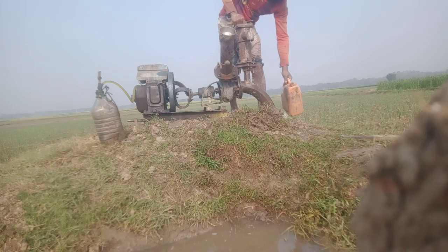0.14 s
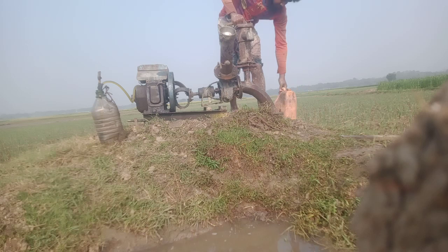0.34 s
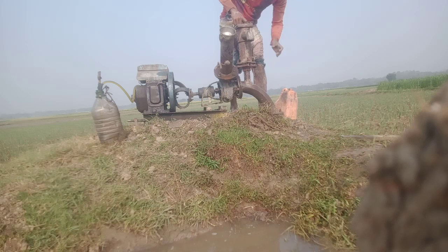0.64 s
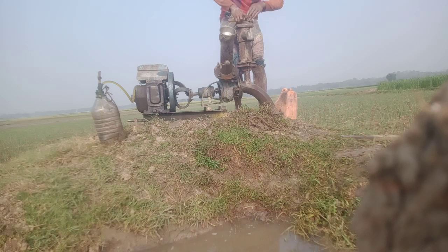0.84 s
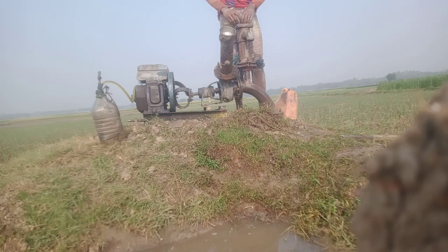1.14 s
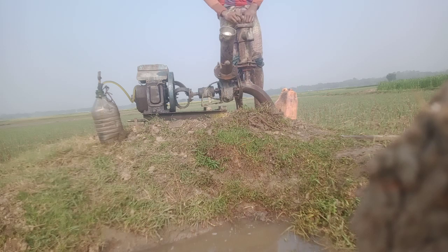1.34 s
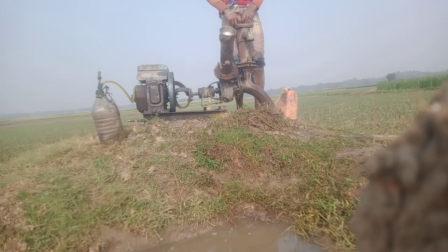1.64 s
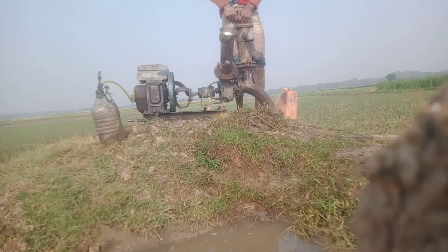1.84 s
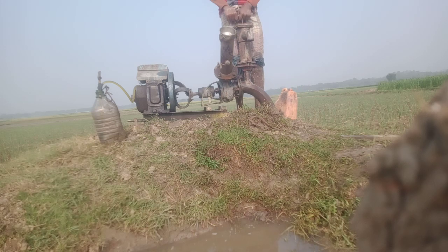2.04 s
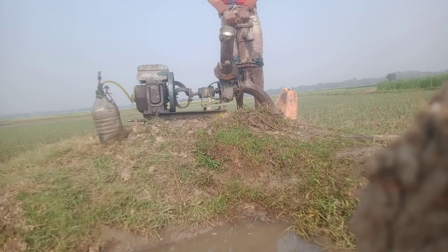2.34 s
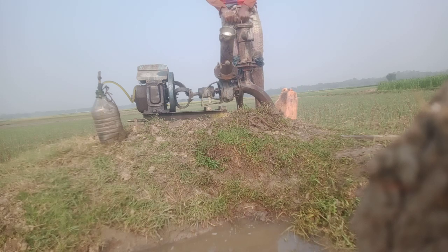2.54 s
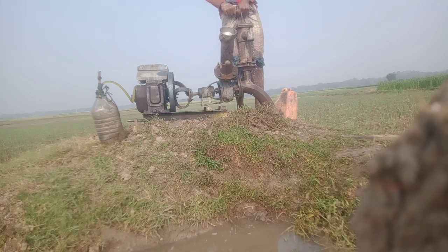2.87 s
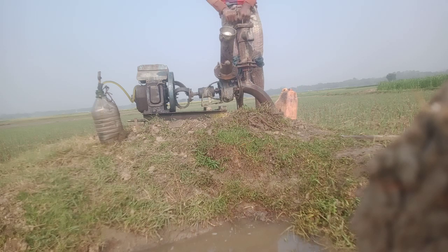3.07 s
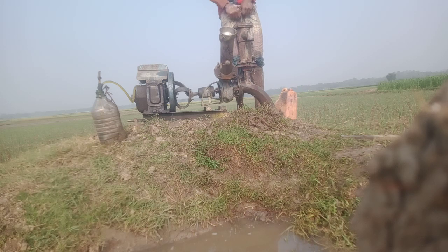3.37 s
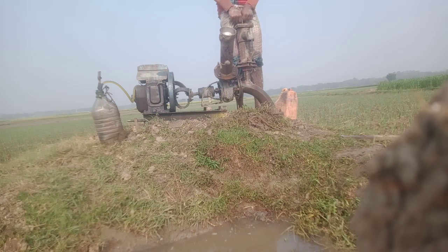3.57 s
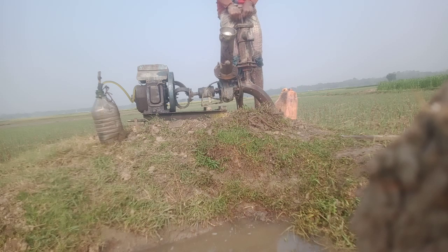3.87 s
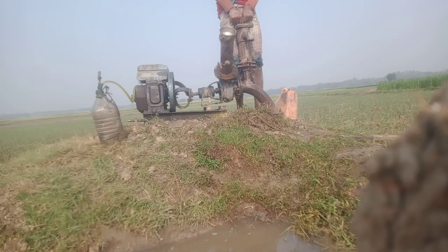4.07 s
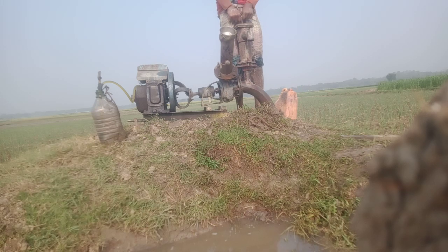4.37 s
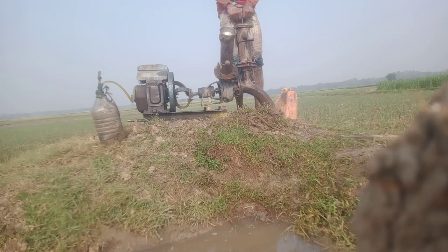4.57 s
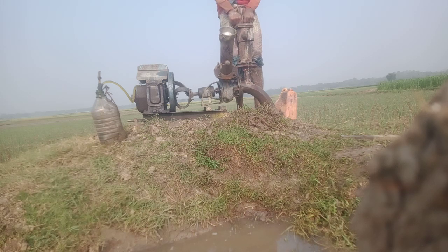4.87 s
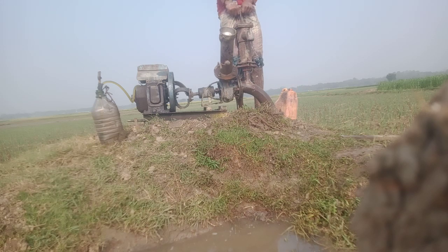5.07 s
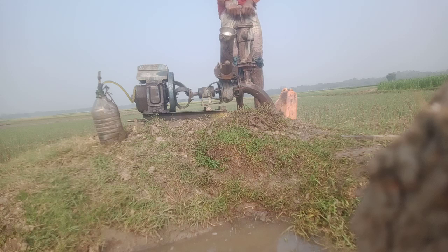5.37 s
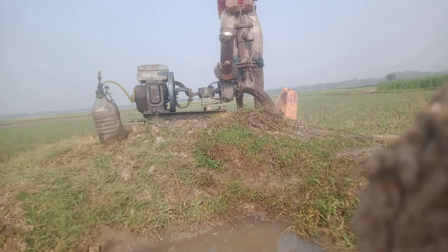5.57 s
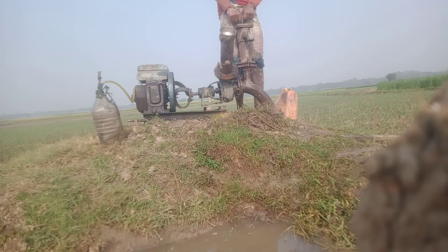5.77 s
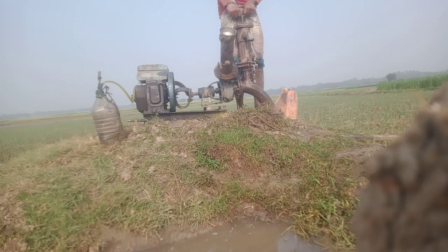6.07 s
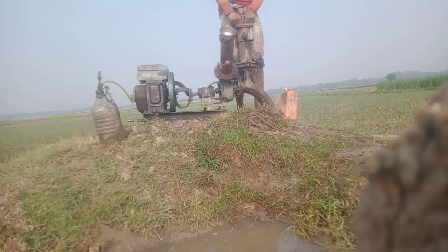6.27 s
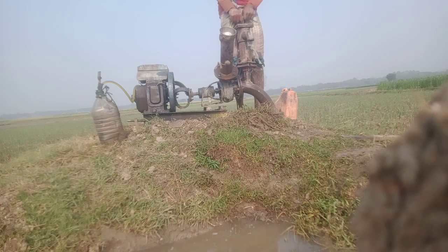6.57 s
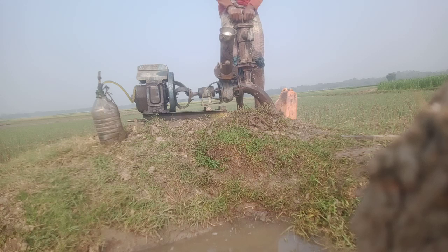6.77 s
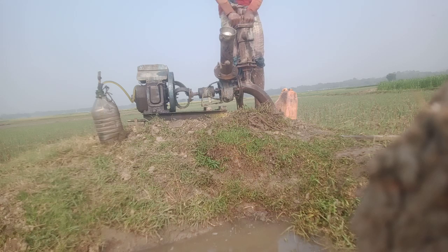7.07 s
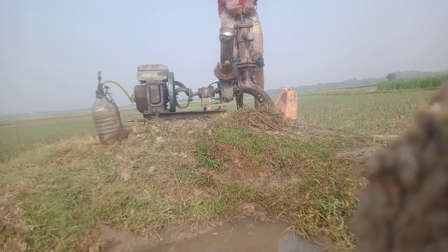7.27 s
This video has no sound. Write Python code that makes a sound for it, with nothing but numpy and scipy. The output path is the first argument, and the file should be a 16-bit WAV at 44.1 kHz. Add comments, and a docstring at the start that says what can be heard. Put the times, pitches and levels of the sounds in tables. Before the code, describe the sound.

An iron hand pump clinks, then clanks, squawks and gulps in quick strokes as water churns, with a faint breeze and distant birds.

```python
"""A cast-iron hand pump draws water into the pipe of a stopped diesel pump in an open field.
After a few loose clinks the handle is worked three to four times a second: the iron links clank,
the valve thumps shut, and the piston's seal squawks as it sticks and slips. Water churns and
bubbles, and the air in the barrel whoops and gulps, its pitch rising and falling with every stroke.
Behind the pump are a low breeze and faint, distant birds."""
import sys
import numpy as np
from scipy import signal
from scipy.fft import rfft, irfft
from scipy.io import wavfile
from scipy.ndimage import uniform_filter1d

SR = 44100
rng = np.random.default_rng(int(sys.argv[2]) if len(sys.argv) > 2 else 0)


def bounce(signal):
    """Save signal as a 16-bit WAV file at the path given by the first command-line argument."""
    frames = np.transpose(np.atleast_2d(signal))
    limited = np.clip(frames, -1, 1)
    pcm = np.round(limited * 32767).astype(np.int16)
    wavfile.write(sys.argv[1], SR, pcm)


N = 327215
TIME = np.arange(N) / SR
AGE = TIME[:SR // 3]  # seconds since one short sound began


def amp(db):
    """Turns decibels into a gain."""
    return 10 ** (np.asarray(db) / 20)


def unit_rms(x):
    """Scales a signal to an average strength (rms) of 1."""
    return x / np.sqrt(np.mean(x ** 2) + 1e-20)


def db_at(spectrum, hz):
    """Reads a level between the points of a spectrum table."""
    f, db = np.transpose(spectrum)
    return np.interp(np.log(hz + 1), np.log(f), db)


def noise(colour, size=len(AGE)):
    """Noise of rms 1; colour(f) says how strong each frequency is, in dB."""
    white = rfft(rng.standard_normal(size))
    return unit_rms(irfft(white * amp(colour(np.fft.rfftfreq(size, 1 / SR))), size))


def wander(hz, size=len(AGE)):
    """A smooth random wobble, up to about hz wiggles a second."""
    return noise(lambda f: -10 * np.log10(1 + (f / hz) ** 6), size)


def lumps(db, hz, size=len(AGE)):
    """A gain that rises and falls at random by roughly db."""
    return unit_rms(amp(2 * db * np.tanh(wander(hz, size) / 2)))


def strike(rise, t60):
    """Swells over about rise seconds, then fades by 60 dB every t60 seconds."""
    shape = (1 - np.exp(-AGE / rise)) * amp(-60 * AGE / t60)
    return shape / shape.max()


def arch(length):
    """Rises from 0 to 1 and falls back within length seconds."""
    return np.sin(np.pi * np.minimum(AGE / length, 1)).clip(0)


def tone(hz):
    """A pure tone of rms 1 with a steady or moving pitch."""
    cycles = np.cumsum(hz * np.ones(len(AGE))) / SR
    return np.sqrt(2) * np.sin(2 * np.pi * (cycles + rng.random()))


def resonate(x, hz, width_hz):
    """Makes a signal ring around a steady or moving pitch."""
    turn = np.exp(2j * np.pi * np.cumsum(hz * np.ones(len(x))) / SR)
    decay = np.exp(-np.pi * width_hz / SR)
    return 2 * (turn * signal.lfilter([1 - decay], [1, -decay], x / turn + 1e-18)).real


def play(source, rows):
    """Makes one sound per table row and adds it at the row's time."""
    mix = np.zeros(N)
    for row in rows:
        sound = source(*row)
        part = mix[max(round(row[0] * SR), 0):][:len(sound)]
        part += sound[:len(part)]
    return mix


# the breeze, from bass to treble: f/Hz, level/dB
BREEZE_SPECTRUM = [(20, -54.5), (50, 0), (120, 13.5), (250, -8), (500, -59), (1500, -15.5), (4200, -27),
                   (5500, -38), (16000, -59)]
def breeze():
    """Moving air rumbles unevenly under a smoother hiss."""
    air = noise(lambda f: db_at(BREEZE_SPECTRUM, f), N)
    rumble = signal.sosfiltfilt(signal.butter(2, 400, fs=SR, output="sos"), air)
    hiss = air - rumble
    return amp(-48) * (rumble * lumps(6.4, 28, N) + hiss * lumps(1.3, 14, N))


def chirp(t, hz, db, length=0.09, glide=1.7):
    """A bird's thin, warbling whistle slides in pitch."""
    return amp(db) * tone(hz * (1 + glide * AGE + 0.035 * wander(170))) * arch(length)


# rising calls that stand out from the flock: t/s, f/Hz, level/dB
BIRD_CALLS = [(.32, 2350, -58), (1.12, 3800, -62), (1.19, 3000, -63)]
def birds(per_s=10, db=-67, low_hz=2200, high_hz=4600):
    """Small birds twitter far off, each call with its own pitch and slide."""
    when, pitch, slope = rng.random((round(per_s * N / SR), 3)).T
    times = (np.arange(len(when)) + when) / per_s
    pitches = low_hz * (high_hz / low_hz) ** pitch
    flock = [(t, hz, db, 0.05, glide) for t, hz, glide in zip(times, pitches, 6 * slope - 2)]
    return play(chirp, BIRD_CALLS + flock)


def column_hz(t, rest_hz=271.7, low_hz=259.6, high_hz=350.4, rising_share=0.5467):
    """Each stroke shortens and lengthens the barrel's air column, so its pitch rises and falls."""
    turns = [row[0] for row in STROKES]
    turns.append(2 * turns[-1] - turns[-2])  # the end of the last stroke
    progress = np.interp(t, turns, np.arange(len(turns))) % 1
    lift = np.sin(np.pi / 2 * np.interp(progress, [0, rising_share, 1], [0, 1, 0])) ** 2
    bottom_hz = np.interp(t, turns[:3], [rest_hz, rest_hz, low_hz])
    return bottom_hz + (high_hz - bottom_hz) * lift


# churning water, from bass to treble: f/Hz, level/dB
CHURN_SPECTRUM = [(30, -37), (80, 1), (180, 7), (550, -8.5), (1000, -11), (2300, -8.5), (4000, -19.5),
                  (5500, -31.5), (16000, -61)]
# air hissing past the seal: f/Hz, level/dB
LEAK_SPECTRUM = [(1000, -11), (4000, 0.5), (7000, 0), (10000, -18), (16000, -6.5)]
# a pipe shut at one end rings near odd multiples of its lowest note: multiple, level/dB
PIPE_OVERTONES = [(3.102, -6.5), (5.201, -8), (7.299, -10.5)]
# how strongly the water moves: t/s, level/dB
WATER_LEVELS = [(0, -40), (.3, -68.5), (1.8, -63), (1.89, -39), (4, -42.5), (4.6, -38), (7.42, -42)]
def water(width_hz=32):
    """Water churns and the air hums; as the column shortens, air spits past the seal and whistles."""
    hz = column_hz(TIME)
    rising = np.maximum(np.gradient(hz), 0)
    airflow = np.tanh(unit_rms(uniform_filter1d(rising, size=200)))
    churn = noise(lambda f: db_at(CHURN_SPECTRUM, f), N) * lumps(8.15, 33, N)
    breath = rng.standard_normal(N) * lumps(4, 30, N)

    def pipe(multiple):
        """One breathy note of the air column."""
        ring = resonate(breath, multiple * hz, width_hz * np.sqrt(multiple))
        return unit_rms(resonate(ring, multiple * hz, 5 * width_hz))
    hollow = amp(-4.5) * unit_rms(sum(amp(level) * pipe(k) for k, level in PIPE_OVERTONES))
    spray = amp(-22) * noise(lambda f: db_at(LEAK_SPECTRUM, f), N) * lumps(5.6, 700, N)
    hum = amp(-3) * np.sqrt(2) * np.sin(2 * np.pi * np.cumsum(hz) / SR) * lumps(2.5, 15, N)
    sound = amp(2.5) * churn + amp(1) * pipe(0.922) + hum + (hollow + spray) * airflow
    return amp(np.interp(TIME, *np.transpose(WATER_LEVELS))) * sound


# water filling the spout: t/s, length/s, level/dB, first f/Hz, last f/Hz
SPOUT_GURGLES = [(1.858, 0.11, -41, 818, 1066), (4.963, 0.14, -54, 864, 1126),
                 (5.172, 0.15, -40, 522, 1007), (5.765, 0.11, -33.5, 630, 970),
                 (6.205, 0.18, -36, 740, 973), (6.802, .2, -36, 689, 1051), (7.121, 0.09, -31, 659, 1095),
                 (7.192, 0.24, -37.5, 342, 597)]
def gurgle(t, length, db, first_hz, last_hz):
    """A shrinking pocket of air sings upward, shaken by the splashing."""
    filled = np.minimum(AGE / length, 1)
    hz = (first_hz + (last_hz - first_hz) * filled) * (1 + 0.015 * wander(74))
    return amp(db) * tone(hz) * lumps(9.9, 70) * arch(length)


# big bubbles bursting: t/s, level/dB, f/Hz
BUBBLES = [(0.597, -42.5, 552), (3.071, -26.5, 547), (3.611, -27, 606), (5.793, -23, 710),
           (6.301, -21, 593), (6.885, -28, 628)]
def plop(t, db, hz):
    """A bubble rings briefly, its pitch rising as it nears the surface."""
    return amp(db) * tone(hz * (0.975 + 4 * AGE)) * strike(0.0042, t60=0.032)


def gulp(t, db, t60, rise=0.0032):
    """The barrel's air rings at a sliding pitch; sloshing shakes it and roughens the overtones."""
    hz = column_hz(t + AGE)
    overtones = sum(amp(level) * tone(k * hz) * wander(130) for k, level in PIPE_OVERTONES)
    low_note = tone(hz * (1 + 0.018 * wander(60))) * lumps(1.2, 60)
    return amp(db) * (low_note + amp(-14) * overtones) * strike(rise, t60)


# the rocking pump jolts the air inside it: t/s, level/dB
ROCKING_JOLTS = [(3.985, -32.5), (4.985, -31), (5.235, -27.5)]
# handle strokes: piston turns t/s, gulp level/dB, valve shuts t/s, thump level/dB, slap level/dB
STROKES = [(1.84, -31.5, 2.07, -37, -45), (2.15, -28, 2.311, -30, -32), (2.395, -27.5, 2.54, -31, -33.5),
           (2.628, -21.5, 2.776, -31.5, -20), (2.812, -29, 3.018, -24.5, -23.5),
           (3.102, -24.5, 3.25, -36.5, -34), (3.347, -27, 3.525, -35, -25), (3.615, -28, 3.75, -31, -30.5),
           (3.92, -29, 4.05, -24, -31.5), (4.137, -26, 4.3, -32, -30.5), (4.396, -25, 4.542, -41, -25),
           (4.677, -20.5, 4.85, -33, -32), (4.911, -20.5, 5.123, -28, -25.5),
           (5.188, -27, 5.398, -23.5, -28.5), (5.474, -25, 5.68, -29, -31), (5.758, -25.5, 5.954, -25, -43),
           (6.055, -27, 6.228, -28, -26), (6.335, -19.5, 6.498, -27, -50), (6.608, -23, 6.775, -25.5, -32),
           (6.882, -24, 7.049, -20, -27), (7.148, -25.5, 7.316, -26, -28)]
def barrel_air(push_t60=0.16, slap_t60=0.046, jolt_t60=0.15, push_rise=0.0047, bounce_s=0.028):
    """The piston pushes the air once a stroke; valve, knocks, whoops, bubbles and rocking jolt it."""
    pushes = [(t, db, push_t60, push_rise) for t, db, *_ in STROKES]
    slaps = [(t, db, slap_t60) for *_, t, _, db in STROKES]
    bounces = [(t + bounce_s, db - 2, t60) for t, db, t60 in slaps]  # the valve bounces once
    # once pumping starts, water softens these jolts
    jolts = [(t, db - (8.5 if t < STROKES[0][0] else 12.5), jolt_t60) for t, db, *_ in KNOCKS_AND_WHOOPS]
    bubbles = [(t, db - 6.5, jolt_t60) for t, db, _ in BUBBLES]
    rocking = [(t, db, jolt_t60) for t, db in ROCKING_JOLTS]
    return play(gulp, pushes + slaps + bounces + jolts + bubbles + rocking)


def thump(t, db):
    """The valve stops the water: a heavy note that sags in pitch, and a dull splash."""
    splash = noise(lambda f: db_at(CHURN_SPECTRUM, f)) * strike(0.00027, t60=0.17)
    hz = 150 * (0.888 + 0.5 * np.exp(-AGE / 0.0035)) * rng.uniform(0.75, 1.3)
    return amp(db) * (tone(hz) * strike(0.011, t60=0.031) + amp(-9.5) * splash)


# the valve falls shut a second time: t/s, level/dB
SECOND_THUMPS = [(3.912, -30.5), (5.141, -28.5), (6.793, -35.5)]
def foot_valve():
    """The valve at the bottom shuts on the way back of every stroke, sometimes twice."""
    return play(thump, [(t, db) for *_, t, db, _ in STROKES] + SECOND_THUMPS)


def tick(t, db, centre_hz=5000):
    """Small metal parts snap brightly, with almost no ring."""
    bright = noise(lambda f: -16 * np.log2((f + 1) / centre_hz) ** 2)
    return amp(db) * bright * strike(0.0001, t60=0.019)


# a pin snaps across its hole: t/s, level/dB
PIN_SNAPS = [(3.861, -37), (4.063, -43), (4.114, -45), (4.865, -40), (4.984, -38), (5.8, -45), (7.142, -40)]
def ticks(per_s=12, below_water_db=10, spread_db=7):
    """Pins snap; grit and loose washers tick at random, louder when more water moves."""
    when, size = rng.random((round(per_s * N / SR), 2)).T
    times = (np.arange(len(when)) + when) / per_s
    levels = np.interp(times, *np.transpose(WATER_LEVELS)) - below_water_db + spread_db * (2 * size - 1)
    return play(tick, PIN_SNAPS + list(zip(times, levels)))


# rattling iron, from bass to treble: f/Hz, level/dB
RATTLE_SPECTRUM = [(100, -56.5), (500, 2), (900, -3), (1500, 6), (1850, -2), (2900, 2), (4200, -11.5),
                   (5000, -20), (7000, -24.5), (10000, -45), (16000, -50.5)]
def joints(slack_s=0.009, settle_s=0.007):
    """Rough joints scrape just before and after each knock or whoop."""
    times, levels = np.transpose(KNOCKS_AND_WHOOPS)[:2]
    coarse_time = TIME[::SR // 1000]
    since = coarse_time[:, None] - times
    pressure = (amp(levels) * np.exp(np.minimum(since / slack_s, -since / settle_s))).sum(axis=1)
    grit = noise(lambda f: db_at(RATTLE_SPECTRUM, f), N) * lumps(1.3, 200, N)
    return amp(-27) * grit * np.interp(TIME, coarse_time, pressure)


# the rod grinds through its guide: t/s, length/s, level/dB
ROD_SCRAPES = [(0.101, 0.05, -49.5), (2.038, 0.048, -38.5), (3.274, 0.046, -29), (3.343, 0.032, -37.5),
               (4.013, 0.02, -42), (5.358, 0.023, -30)]
def scrape(t, length, db):
    """Dry iron catches and lets go in a ragged, grainy burst."""
    grains = noise(lambda f: db_at(RATTLE_SPECTRUM, f)) * lumps(4.2, 320)
    return amp(db) * grains * np.sqrt(arch(length))


# the notes that the rubbing seal brings out: f/Hz, width/Hz, level/dB
SEAL_NOTES = [(1170, 70, 10.5), (1560, 150, 8.5), (2920, 160, 9.5), (3950, 200, -3), (4900, 120, -7)]
# the piston's seal sticks and slips: t/s, length/s, level/dB
SEAL_SQUAWKS = [(5.057, 0.015, -24), (5.588, 0.054, -26.5), (5.864, 0.05, -24), (6.435, 0.031, -27)]
def squawk(t, length, db, slips_hz=260, jitter=0.5):
    """Uneven slips of the seal make the barrel wall ring, with a rasp at each slip."""
    cycles = np.cumsum(slips_hz * np.exp(jitter * wander(300))) / SR
    slips = np.diff(np.floor(cycles), prepend=0)  # one click per cycle
    pressure = arch(length) ** 0.57
    rubbing = (unit_rms(slips) + 0.8 * rng.standard_normal(len(AGE))) * pressure
    wall = sum(amp(level) * unit_rms(resonate(resonate(rubbing, f, 2 * width), f, 2 * width))
               for f, width, level in SEAL_NOTES)
    rasp = noise(lambda f: db_at(RATTLE_SPECTRUM, f)) * pressure * (1 + np.cos(2 * np.pi * cycles) / 2)
    sound = unit_rms(unit_rms(wall) + amp(-6) * unit_rms(rasp))
    return amp(db) * sound * np.sqrt(length / AGE[-1])  # short and long squawks are equally strong


def ringing(notes, scatter_db, detune, colour=lambda f: 0):
    """Struck metal rings at several notes at once, their levels and pitches a little new each time."""
    return unit_rms(sum(amp(level + colour(f) + scatter_db * rng.standard_normal())
                        * tone(f * (1 + detune * rng.standard_normal())) for f, level in notes))


# the notes of the pins and washers: f/Hz, level/dB
PIN_NOTES = [(4600, 8.5), (5760, 3), (6670, 2.5), (7020, -3), (7500, -9), (8980, -12)]
def ping(t, db):
    """Small steel parts ring high and briefly."""
    return amp(db) * ringing(PIN_NOTES, scatter_db=5, detune=0.015) * strike(0.00027, t60=0.06)


# the free handle rings on after some knocks: t/s, level/dB, f/Hz
HANDLE_RINGS = [(0.008, -47, 3190), (0.748, -55, 3510), (1.062, -49, 3235), (3.981, -45, 2306),
                (6.128, -32, 2420), (6.613, -36, 3780), (6.948, -29, 2390), (7.367, -51, 3930)]
def handle_ring(t, db, hz, dry_t60=0.36, wet_t60=0.16):
    """The iron handle holds one thin note, longer while the pump is still dry."""
    return amp(db) * tone(hz) * strike(0.0011, dry_t60 if t < STROKES[0][0] else wet_t60)


# the notes of the pump's body and handle: f/Hz, level/dB
IRON_NOTES = [(1010, 9), (1160, -15), (1430, 8.5), (1560, 3.5), (2190, 12), (2400, 7.5), (2890, 4.5),
              (3560, -20.5), (3820, -3.5), (4090, -6)]
def knock_or_whoop(t, db, hz, treble_db, t60):
    """A crack, a rattle and ringing iron around one strongest note, of the iron or the barrel's air."""
    def colour(f):
        """Lifts the sound around hz and turns the treble up or down."""
        peak = 6 * np.exp(-(np.log((f + 1) / hz) / 0.047) ** 2)
        treble = 0.5 + 0.5 * np.tanh((f - 3300) / 500)
        return peak + 1.28 * (treble_db + 13) * treble
    snap = strike(0.00019, t60=0.018)
    delays = rng.uniform(0.003, 0.018, size=2)  # loose parts bounce back twice
    rebounds = sum(np.interp(AGE - delay, AGE, snap, left=0) for delay in delays)
    bright = noise(lambda f: db_at(RATTLE_SPECTRUM, f) + colour(f) + 4 * np.log2(1 + f / 4000))
    crack = bright * (snap + amp(-10) * rebounds)
    swell = strike(0.00094, 0.57 * t60)
    chatter = swell * lumps(5.6, 87)
    chatter *= np.linalg.norm(swell) / np.linalg.norm(chatter)  # uneven, but with the same energy
    rattle = noise(lambda f: db_at(RATTLE_SPECTRUM, f) + colour(f)) * chatter
    body = ringing(IRON_NOTES, scatter_db=7.5, detune=0.014, colour=colour) * strike(0.0016, t60)
    main_note = tone(hz) * strike(0.0013, 0.87 * t60)
    return amp(db) * (amp(-6) * crack + amp(-3.5) * rattle + amp(-6) * body + amp(-5.5) * main_note)


def loose_knocks(per_s=5, below_water_db=1, spread_db=5, low_hz=1200, high_hz=4100):
    """Once pumping starts, loose pins knock lightly, harder when more water moves."""
    when, size, pitch = rng.random((round(per_s * N / SR), 3)).T
    times = (np.arange(len(when)) + when) / per_s
    levels = np.interp(times, *np.transpose(WATER_LEVELS)) - below_water_db + spread_db * (2 * size - 1)
    pitches = low_hz * (high_hz / low_hz) ** pitch
    knocks = [(t, db, hz, -13, 0.05) for t, db, hz in zip(times, levels, pitches) if t > STROKES[0][0]]
    return play(knock_or_whoop, knocks)


# knocks of the iron links and short hollow whoops of the barrel's air, each with its strongest ring:
# t/s, level/dB, strongest ring f/Hz, treble level/dB
KNOCKS_AND_WHOOPS = [(0.008, -21.5, 1440, -5.5), (0.101, -36, 1255, -11.5), (0.176, -37.5, 1430, -4),
                     (0.515, -56.5, 1475, -3), (0.597, -45, 1540, -11), (0.748, -41.5, 3480, -11),
                     (0.854, -33.5, 2150, -5.5), (1.059, -28, 3020, -6.5), (1.09, -39, 1507, -10),
                     (1.271, -50.5, 1500, -33), (1.435, -30.5, 1450, -18), (1.481, -27.5, 1586, -10.5),
                     (1.868, -33, 1566, -9.5), (2.036, -30.5, 2340, -3.5), (2.179, -31.5, 1655, -3.5),
                     (2.31, -30.5, 956, -37), (2.324, -16, 782, -7.5), (2.334, -22, 760, -11),
                     (2.43, -28, 884, -3.5), (2.544, -27.5, 2324, -14), (2.556, -21, 2290, -8),
                     (2.651, -26, 1730, -2), (2.771, -26.5, 866, -28), (2.786, -20.5, 887, -9.5),
                     (2.875, -25, 950, -9), (3.013, -26, 2405, -9.5), (3.124, -29, 3980, 0),
                     (3.267, -24, 2325, -3.5), (3.343, -26.5, 1465, -13), (3.395, -23.5, 2390, -8.5),
                     (3.524, -30.5, 940, -33), (3.541, -32.5, 1530, 1), (3.55, -27.5, 2530, -17),
                     (3.59, -30, 1380, -10.5), (3.632, -25, 1465, -6), (3.754, -23, 2055, -14),
                     (3.79, -27, 2400, -7.5), (3.862, -26.5, 1413, -19), (3.978, -32.5, 2334, -13),
                     (4.123, -28, 1515, -17), (4.136, -26, 2925, -16), (4.227, -26.5, 1620, -6.5),
                     (4.269, -21.5, 2134, -15.5), (4.372, -23.5, 1444, -10), (4.466, -30.5, 2440, -11),
                     (4.509, -28.5, 1324, -2.5), (4.546, -22.5, 2180, -16), (4.588, -27.5, 2390, -5.5),
                     (4.647, -20.5, 2365, -11.5), (4.682, -31, 2400, -6.5), (4.81, -22, 2150, -14.5),
                     (4.843, -28, 1470, 0), (4.906, -24.5, 1466, -17), (4.958, -22, 1427, -26),
                     (4.967, -20, 2060, -8.5), (5.187, -22, 1490, -40), (5.235, -28, 1470, -39),
                     (5.364, -22, 2100, -32), (5.477, -24.5, 1745, -18), (5.528, -14, 1490, -7),
                     (5.801, -19.5, 2510, -10), (5.829, -22.5, 863, -13.5), (5.971, -23, 1512, -7),
                     (6.031, -30.5, 2700, -21), (6.053, -27.5, 3870, -7), (6.065, -17, 2937, -20),
                     (6.128, -26, 2360, -5), (6.176, -32.5, 3870, -2.5), (6.332, -26, 2130, -27),
                     (6.407, -19, 2376, -7.5), (6.521, -24.5, 1389, -12), (6.613, -17.5, 2966, -6.5),
                     (6.722, -32.5, 2170, -2), (6.848, -29.5, 810, -12.5), (6.906, -28, 1542, -12),
                     (6.945, -27.5, 2400, 0.5), (7.022, -32.5, 2400, -6), (7.06, -30, 1404, -9),
                     (7.113, -27, 2130, -13), (7.157, -14.5, 1526, -9), (7.27, -30, 3030, -7.5),
                     (7.367, -33, 3780, -13), (7.394, -34.5, 2110, -7.5)]
def knocks_and_whoops(loud_t60=0.067, loud_db=-18, doubling_db=26):
    """The links knock and the barrel's air whoops; the louder the sound, the shorter it rings."""
    sounds = [(t, db, hz, treble, loud_t60 * 2 ** ((loud_db - db) / doubling_db))
              for t, db, hz, treble in KNOCKS_AND_WHOOPS]
    pins = [(t, db + treble - 13) for t, db, _, treble in KNOCKS_AND_WHOOPS]
    return play(knock_or_whoop, sounds) + play(handle_ring, HANDLE_RINGS) + play(ping, pins)


def scene():
    """The pump in the open, with no walls to echo it."""
    clatter = knocks_and_whoops() + joints() + loose_knocks()
    clatter += play(squawk, SEAL_SQUAWKS) + play(scrape, ROD_SCRAPES) + ticks()
    barrel = amp(4.5) * barrel_air() + amp(4) * foot_valve()
    barrel += play(plop, BUBBLES) + play(gurgle, SPOUT_GURGLES)
    return (clatter + barrel + water() + breeze() + birds())[None]


def record(dry, low_hz=42, high_hz=16000):
    """A small microphone loses the deepest bass, and the highest treble is cut off."""
    thin = signal.sosfilt(signal.butter(2, low_hz, "highpass", fs=SR, output="sos"), dry)
    treble_cut = signal.firwin(511, high_hz, window=("kaiser", 9), fs=SR)
    return signal.oaconvolve(thin, treble_cut[None], "same")


dry = scene()
out = record(dry)
bounce(out)
```